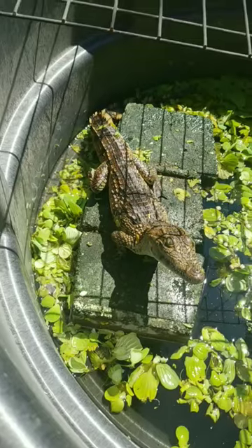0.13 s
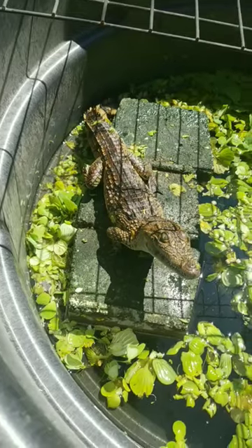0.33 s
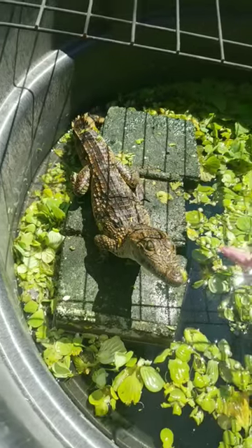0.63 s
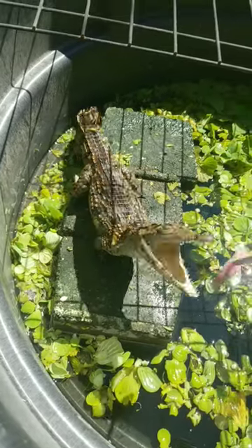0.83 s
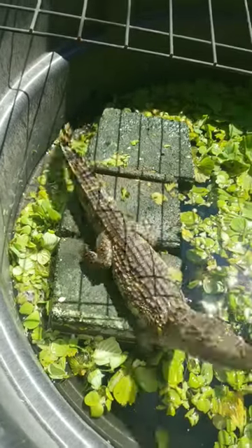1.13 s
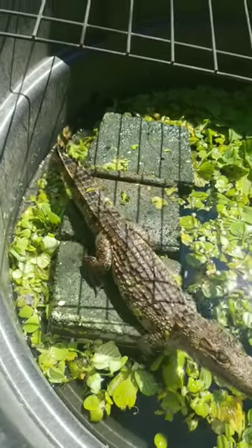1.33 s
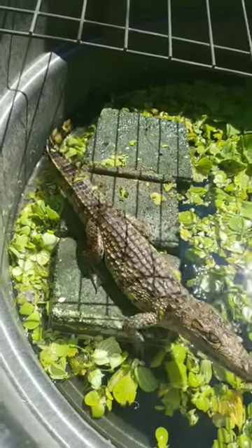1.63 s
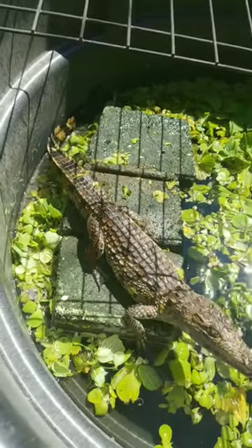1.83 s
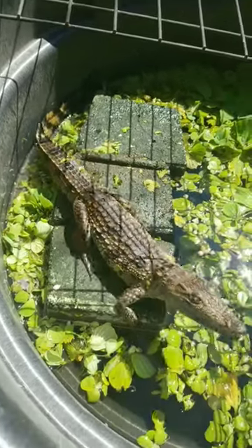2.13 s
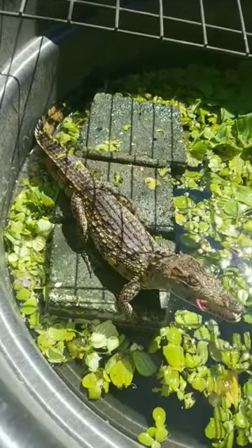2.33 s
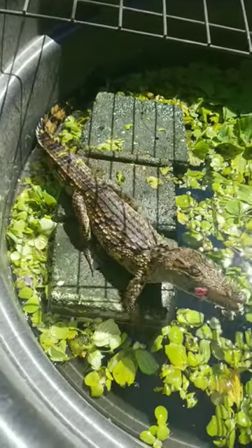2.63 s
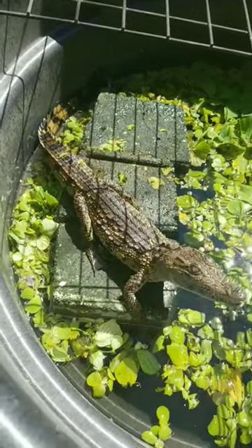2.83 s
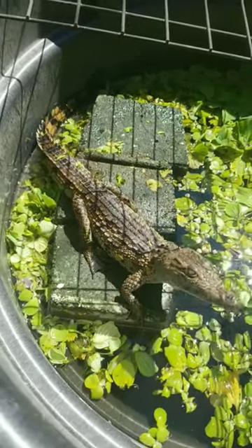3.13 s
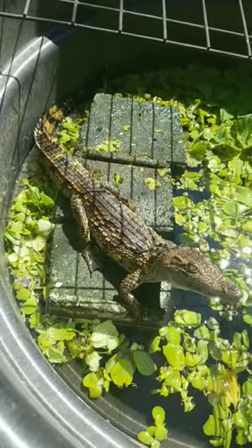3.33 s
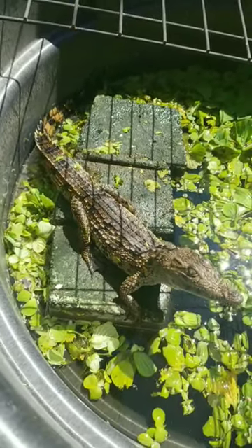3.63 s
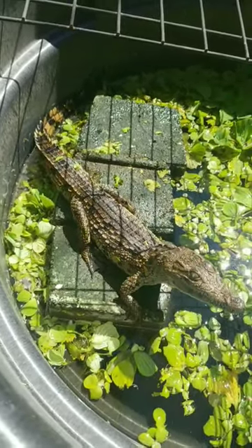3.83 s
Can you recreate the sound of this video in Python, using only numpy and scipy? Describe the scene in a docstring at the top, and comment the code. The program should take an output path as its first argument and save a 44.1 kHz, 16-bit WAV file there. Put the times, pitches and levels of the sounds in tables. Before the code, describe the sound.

Two sharp hollow jaw snaps from a young crocodile over faint water trickling in a tub

```python
"""A thin stream trickling into a steel water tub fades in at the start, over a low rumble and hum, probably a pump.
Drops splat as coloured noise puffs and ring tiny gliding sine bubbles; larger bubbles plop; noise makes the wash.
Then a young crocodile snaps at food: two sharp, hollow knocks of decaying modes, each led in by softer contacts.
The water and the rumble carry on to the end."""
import sys
import numpy as np
from scipy import signal
from scipy.fft import rfft, irfft, next_fast_len
from scipy.io import wavfile
from scipy.ndimage import map_coordinates

SR = 44100
rng = np.random.default_rng(int(sys.argv[2]) if len(sys.argv) > 2 else 0)


def materialize(psi):
    """Save the field psi as 16-bit PCM at rate SR to the path in sys.argv[1].

    A 1-D psi becomes a single channel; in a 2-D psi each row is a channel.
    """
    bounded = np.clip(np.atleast_2d(psi).T, -1, 1)
    quanta = np.round(bounded * 32767).astype(np.int16)
    wavfile.write(sys.argv[1], SR, quanta)


N = 176400  # length in samples

ATTACK_S = 0.00059  # rise time constant of every noise puff
SPLAT_S, SPLAT_T60_S = 0.0034, 0.026  # how long a drop keeps breaking up, and its decay
FIZZ_SPREAD, FIZZ_T60_S = 0.17, 0.007  # log pitch spread and decay of the finest bubbles


def amp(db):
    """Decibels to gain."""
    return 10 ** (np.asarray(db) / 20)


def unit(x):
    """Scale to rms 1."""
    return x / np.sqrt(np.mean(x ** 2) + 1e-20)


def along(points, hz):
    """Interpolate (Hz, value) points on a log frequency axis."""
    point_hz, values = np.transpose(points)
    return np.interp(np.log(hz + 1), np.log(point_hz + 1), values)


def filtered(x, response):
    """Multiply the spectrum of x by a response, given as a function of frequency."""
    size = next_fast_len(len(x) + 8192)
    spectrum = rfft(x, size) * response(np.fft.rfftfreq(size, 1 / SR))
    return irfft(spectrum, size)[:len(x)]


def noise(colour, size):
    """Coloured noise of rms 1."""
    return unit(filtered(rng.standard_normal(size), lambda hz: amp(along(colour, hz))))


def wobble(rate):
    """A smooth random curve with rate knots a second."""
    knots = rng.standard_normal(int(N * rate / SR) + 4)
    return map_coordinates(knots, [np.arange(N) * rate / SR])


def level(points):
    """Gain per sample from (seconds, dB) points."""
    return amp(np.interp(np.arange(N) / SR, *np.transpose(points)))


def add(track, s, sound):
    """Mix a sound into the track at s seconds."""
    part = track[max(round(s * SR), 0):][:len(sound)]
    part += sound[:len(part)]


def event_time():
    """Time axis in seconds of one short event."""
    return np.arange(SR // 16) / SR


def burst(colour, hold, t60):
    """A grainy puff of noise, coloured a little differently each time: attack, hold, release."""
    grain_db, colour_scatter_db = 3.5, 3.5
    t = event_time()
    grain_levels = np.repeat(rng.standard_normal(len(t)), 10)[:len(t)]  # one level per 10 samples
    grains = rng.standard_normal(len(t)) * amp(grain_db * grain_levels)
    own_colour = [(hz, db + colour_scatter_db * rng.standard_normal()) for hz, db in colour]
    puff = unit(filtered(grains, lambda hz: amp(along(own_colour, hz))))
    attack = 1 - np.exp(-t / ATTACK_S)
    release = amp(-60 * np.maximum(t - hold, 0) / t60)
    return puff * attack * release


def bubbles(hz, spread, span, t60, count):
    """A cluster of decaying sines, peak 1, gliding up; the first has pitch hz, later ones are sparser and weaker."""
    rise_per_s, fade_db = 4.5, 7  # pitch rise as a fraction per second; level drop across the cluster
    late = np.linspace(0, 1, count)[:, None] ** 2
    birth = span * late * rng.uniform(0.6, 1.4, (count, 1))
    age = np.maximum(event_time() - birth, 0)
    pitch = hz * np.exp(spread * np.r_[0, rng.uniform(-1.7, 1.7, count - 1)])[:, None]
    size = np.r_[1, rng.uniform(0.5, 1, count - 1)][:, None] * amp(-fade_db * late)
    cycles = pitch * age * (1 + rise_per_s * age / 2)
    onset = np.minimum(cycles, 1)  # each bubble swells over its first cycle
    decay = np.exp(-np.log(1000) * age / t60)
    cluster = (size * np.sin(2 * np.pi * cycles) * onset * decay).sum(0)
    return cluster / np.abs(cluster).max()


def tub(x, t60s):
    """Short reverberation between the tub's walls: decaying noise of unit energy after a 1/300 s gap."""
    hz, t, grid = signal.stft(rng.standard_normal(SR // 4), SR, nperseg=256)
    decay = amp(-60 * t / along(t60s, hz)[:, None])
    tail = signal.istft(grid * decay, SR, nperseg=256)[1]
    delayed = np.pad(x, (SR // 300, 0))
    return signal.fftconvolve(delayed, tail / np.linalg.norm(tail))[:N]


def prickles():
    """Stray little clusters of bursting bubbles, each at its own pitch and moment."""
    rate, scatter_db = 135, 4  # clusters per second over all bands; level scatter
    # Each row: centre pitch in Hz, log pitch spread, typical peak in dB ahead of the tub.
    prickle_bands = [(3620, 0.36, -42.5), (6880, 0.23, -48.5), (12740, 0.152, -48)]
    out = np.zeros(N)
    for hz, spread, db in prickle_bands:
        count = int(rate * N / SR / len(prickle_bands))
        draws = np.clip(rng.standard_normal((count, 3)), -1.8, 1.8)
        for k, (when, size, pitch) in enumerate(draws):
            cluster = bubbles(hz * np.exp(spread * pitch), FIZZ_SPREAD, SPLAT_S, FIZZ_T60_S, count=2)
            add(out, (k + when) * N / SR / count, amp(db + scatter_db * size) * cluster)
    return out


def drop(db, hz, spray_db):
    """One drop: a crackle of tiny bubbles, a splash and fine fizzing spray."""
    breakup_s = 0.01  # time over which its bubbles are born
    # Splash tone. Each row: frequency in Hz, relative level in dB.
    splash_colour = [(700, -9), (1600, -5), (2200, -32), (4500, 3.5), (7000, -3.5), (10000, 1), (16000, 4)]
    # Spray tone. Each row: frequency in Hz, relative level in dB.
    spray_colour = [(2000, -3.5), (5000, 8), (7000, 6.5), (9300, 2), (11800, 9.5), (16000, -5)]
    crackle = bubbles(hz, spread=0.21, span=breakup_s, t60=0.009, count=10)
    fizz = bubbles(12740, FIZZ_SPREAD, breakup_s, FIZZ_T60_S, count=5)
    body = amp(-0.5) * crackle + amp(-19) * burst(splash_colour, SPLAT_S, SPLAT_T60_S)
    spray = amp(1.7) * burst(spray_colour, SPLAT_S, SPLAT_T60_S) + amp(7.5) * fizz
    return amp(db) * body + amp(spray_db) * spray


def plop(db, hz):
    """A few larger bubbles, rising in pitch as they die."""
    return amp(db) * bubbles(hz, spread=0.07, span=0.022, t60=0.042, count=3)


def trickle():
    """Clear drops and plops among many small random ones, coloured by the tub's resonances and walls."""
    # The clearest drops. Each row: start in seconds, body level in dB, bubble pitch in Hz, spray level in dB;
    # drop() trims its layers from these levels.
    clear_drops = [(0.4544, -36.5, 2260, -60), (0.4972, -30.5, 2290, -49), (0.7553, -32, 2500, -67),
                   (0.8323, -25.5, 2600, -56), (0.885, -60, 3390, -44.5), (0.9123, -31.5, 2130, -46.5),
                   (0.9777, -35.5, 4620, -49.5), (1.0, -59, 3100, -45.5), (1.04, -29, 1370, -60),
                   (1.043, -29.5, 2560, -47), (1.141, -38, 3860, -49), (1.1781, -33.5, 2300, -57),
                   (1.2113, -42, 3100, -50), (1.225, -34, 3070, -58), (1.253, -26.5, 4270, -51),
                   (1.3468, -23, 2490, -43), (1.482, -34.5, 3110, -54), (1.5412, -36, 3180, -47),
                   (1.7724, -31, 2340, -45.5), (1.8321, -31.5, 3200, -39), (1.8569, -31, 2040, -58),
                   (1.95, -58, 2980, -56), (1.957, -31, 2760, -53), (2.0847, -34.5, 4160, -46.5),
                   (2.1251, -26, 4110, -42.5), (2.156, -33, 3330, -58.5), (2.186, -32.5, 3340, -44.5),
                   (2.2379, -29, 3840, -68), (2.295, -26, 3240, -50), (2.3393, -36, 5480, -46.5),
                   (2.388, -60, 3070, -43), (2.4725, -35.5, 4900, -64), (2.486, -48, 3000, -47),
                   (2.5588, -35.5, 3030, -47.5), (2.578, -42, 3000, -54), (2.619, -34, 2270, -67),
                   (2.628, -31.5, 3800, -63), (2.6482, -26, 4840, -49), (2.7128, -26.5, 3550, -49),
                   (2.773, -28, 2350, -63), (2.779, -34.5, 1200, -70), (2.787, -33.5, 4530, -67),
                   (2.8, -43, 5500, -62), (2.8604, -34, 3260, -48), (2.9557, -30, 3370, -45),
                   (3.014, -58, 1820, -48.5), (3.052, -32, 3040, -65), (3.1052, -31.5, 4880, -45),
                   (3.1308, -30, 2250, -46), (3.269, -32.5, 4900, -56), (3.2919, -28, 2260, -50),
                   (3.388, -50, 3900, -42), (3.3946, -28, 5200, -49), (3.4626, -28, 2400, -49),
                   (3.476, -34.5, 1500, -58), (3.5135, -33, 3100, -41.5), (3.5731, -36, 1970, -44),
                   (3.6435, -44, 2200, -50), (3.6706, -31.5, 3820, -36.5), (3.7027, -31.5, 2520, -44),
                   (3.718, -32, 3380, -51), (3.74, -35, 4100, -49.5), (3.8118, -25, 4340, -50),
                   (3.826, -32, 4100, -40), (3.856, -51, 3800, -47), (3.916, -48, 2130, -43),
                   (3.9446, -31.5, 2480, -52), (3.966, -34.5, 4200, -59), (3.9792, -41, 1800, -46)]
    # Deeper bubbles. Each row: start in seconds, level in dB ahead of the plop trim, pitch in Hz.
    clear_plops = [(1.396, -30, 560), (1.695, -33, 700), (1.724, -30, 614), (1.752, -30, 704),
                   (1.778, -29, 654), (1.852, -30, 666), (1.887, -32, 680), (2.058, -30.5, 670),
                   (2.2, -31.5, 397), (2.555, -32.5, 684), (2.803, -29.5, 700), (2.868, -30.5, 430),
                   (3.468, -25.5, 668), (3.535, -28.5, 594), (3.717, -25, 690), (3.97, -29.5, 530)]
    # How the small deep bubbles come and go. Each row: time in seconds, level offset in dB.
    gurgle_swell = [(.2, 2), (.6, 2), (1.05, 2), (1.6, -1.5), (1.78, 0.5), (1.95, -8), (2.3, -1.5),
                    (2.8, 4.5), (3.3, -7.5), (3.5, 1.5), (4, 1.5)]
    # Resonances of the tub. Each row: centre in Hz, width in Hz, level in dB relative to the direct sound.
    tub_rings = [(2200, 55, 1.5), (3105, 114, 1.5), (4190, 280, -8.5)]
    # Decay between the walls. Each row: frequency in Hz, t60 in seconds.
    wall_t60 = [(300, 0.082), (3000, 0.065), (14000, 0.039)]
    plop_trim_db, tub_db = -4.5, -6.5
    drip_rate, drip_db, drip_spray_db, drip_scatter_db, drip_hz = 30, -41, -56.5, 2.6, 2800  # rate per second
    gurgle_rate, gurgle_db, gurgle_hz, gurgle_spread = 40, -42.5, 614.5, 0.2  # rate per second, log spread

    out = prickles()
    for s, db, hz, spray_db in clear_drops:
        add(out, s, drop(db, hz, spray_db))
    for s, db, hz in clear_plops:
        add(out, s, plop(db + plop_trim_db, hz))

    # the small drops between
    drips = rng.uniform(-1.7, 1.7, (int(drip_rate * N / SR), 4))
    for k, (when, size, pitch, spray) in enumerate(drips):
        body_db = drip_db + drip_scatter_db * size
        spray_db = drip_spray_db + drip_scatter_db * spray
        add(out, (k + when) / drip_rate, drop(body_db, drip_hz * np.exp(0.3 * pitch), spray_db))

    # small deep bubbles
    gurgles = rng.standard_normal((int(gurgle_rate * N / SR), 3))
    for k, (when, size, pitch) in enumerate(gurgles):
        s = (k + when) / gurgle_rate
        db = gurgle_db + np.interp(s, *np.transpose(gurgle_swell)) + 1.5 * size
        add(out, s, plop(db, gurgle_hz * np.exp(gurgle_spread * pitch)))

    def ringing(f):
        """Direct sound plus a bandpass resonance for each ring."""
        return 1 + sum(amp(db) * 1j * f * width / (centre * centre - f * f + 1j * f * width)
                       for centre, width, db in tub_rings)

    out = filtered(out, ringing)
    return out + amp(tub_db) * tub(out, wall_t60)


def churn():
    """The soft wash where the stream meets the water: coloured noise with a quickly wavering level."""
    # Tone of the churning water. Each row: frequency in Hz, relative level in dB.
    wash_colour = [(120, -5), (200, -2), (340, -5.5), (620, -8.5), (870, -14.5), (1200, -13), (2000, -18),
                   (2800, -22), (3100, -18.5), (3400, -21), (4800, -26), (7000, -33.5), (9300, -43),
                   (12000, -35), (15500, -31)]
    return noise(wash_colour, N) * amp(-41 + 1.23 * wobble(24.95))


def background():
    """A low rumble of wavering noise and a hum of sines with unsteady phase, probably a pump."""
    # Tone of the rumble. Each row: frequency in Hz, relative level in dB.
    rumble_colour = [(15, -45), (27, -38), (37, -6.5), (48, -7), (62, 4.5), (85, 5), (100, -0.5),
                     (130, -0.5), (165, -8), (260, -10.5), (400, -48.5)]
    # Hum partials. Each row: frequency in Hz, rms level in dB ahead of the fade.
    hum_partials = [(66, -46.5), (120, -42.5), (139, -43), (278, -54.5), (393, -56)]
    t = np.arange(N) / SR
    rumble = noise(rumble_colour, N) * amp(-36 + 0.73 * wobble(6.35))
    hum = sum(np.sqrt(2) * amp(db) * np.sin(2 * np.pi * hz * t + 0.84 * wobble(16))
              for hz, db in hum_partials)
    return rumble + hum


def knocks():
    """Decaying modes struck by each contact: soft ones ring only the low modes, hard ones the hollow ones too."""
    # Contacts of both knocks. Each row: start in seconds, level in dB, hardness as a lowpass cutoff in Hz.
    contacts = [(0.6135, -11, 900), (.6148, -11, 830), (.6178, -5.5, 724), (0.6216, -6.5, 970),
                (0.6255, 0.5, 1380), (.781, -3.5, 760), (0.784, -1.5, 1030), (0.788, -0.2, 1890),
                (0.8037, -23, 1800)]
    # What the knocks ring with. Each row: pitch in Hz, level in dB, t60 in seconds,
    # build-up time constant in seconds.
    modes = [(275, -20.5, 0.025, 0.0037), (426, -21.5, 0.043, 0.0018), (608, -17.5, 0.019, 0.00054),
             (687, -19.5, 0.028, 0.00088), (840, 0, 0.0041, 0.00021), (1252, -14.5, 0.053, 0.0033),
             (1364, 3.5, 0.011, 0.0024), (1442, -1, 0.021, 0.0015), (1486, -20, 0.035, .005),
             (1610, -12.5, 0.031, 0.0026), (1880, -26, 0.016, 0.0012)]
    # Wet scrapes of the knocks. Each row: start in seconds, level in dB, length in seconds ahead of the decay.
    scrapes = [(0.605, -34.5, .002), (0.613, -27, 0.0087), (0.625, -34, .003), (0.7802, -22.5, 0.0015),
               (0.787, -27, 0.0023)]
    # Tone of the scrapes. Each row: frequency in Hz, relative level in dB.
    scrape_colour = [(1500, 6), (2700, -7), (4000, 1.5), (6000, -7.5), (8500, -14.5), (12500, 0),
                     (16000, -1.5)]
    # Ringing of the tub after a knock. Each row: frequency in Hz, t60 in seconds.
    knock_t60 = [(300, 0.12), (900, 0.097), (1400, 0.12), (2200, .08), (14000, 0.051)]
    out, t = np.zeros(N), event_time()
    ring = sum(amp(db - 60 * t / t60) * (1 - np.exp(-t / rise)) * np.sin(2 * np.pi * hz * t)
               for hz, db, t60, rise in modes)
    for s, db, hard_hz in contacts:
        soften = signal.butter(6, hard_hz, fs=SR, output="sos")
        add(out, s, amp(db) * signal.sosfilt(soften, ring))
    for s, db, length in scrapes:
        add(out, s, amp(db) * burst(scrape_colour, length, t60=0.019))
    return out + amp(-18.5) * tub(out, knock_t60)


def scene():
    """Water and rumble fade in, and the knocks stand out over them."""
    # Fade-in of the water. Each row: time in seconds, gain in dB.
    water_fade = [(.15, -90), (.175, -26), (.23, -12.5), (.32, -7.5), (.44, -2), (.7, -0.5), (1., 0.75)]
    # Fade-in of rumble and hum. Each row: time in seconds, gain in dB.
    rumble_fade = [(.15, -90), (.185, -23), (.3, -19), (.44, -4.5), (.7, -2), (1., -1), (1.5, 0), (1.76, 2),
                   (1.95, 0), (4, 0)]
    water = level(water_fade) * (trickle() + churn())
    low_end = level(rumble_fade) * background()
    return (water + low_end + knocks())[None]


def record(dry):
    """Limit the band: a 400 Hz wide slope centred on 15.6 kHz, nothing kept above it."""
    top_hz = 15600
    return filtered(dry[0], lambda hz: np.clip((top_hz - hz) / 400 + 0.5, 0, 1))[None]


dry = scene()
out = record(dry)
materialize(out)
```